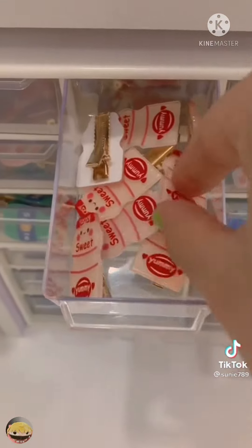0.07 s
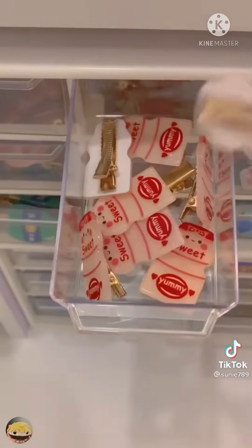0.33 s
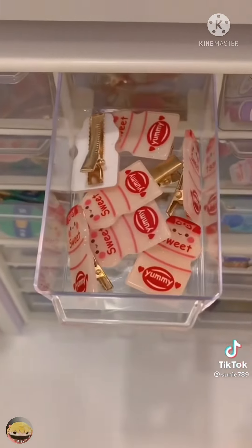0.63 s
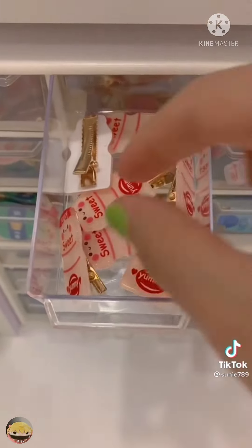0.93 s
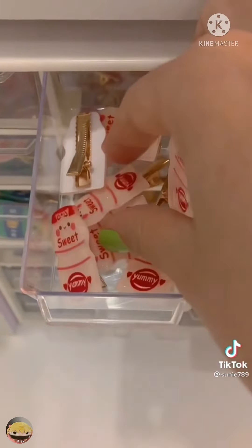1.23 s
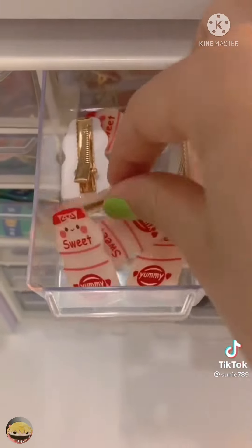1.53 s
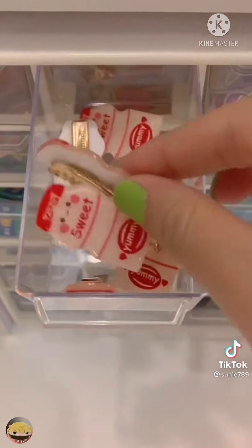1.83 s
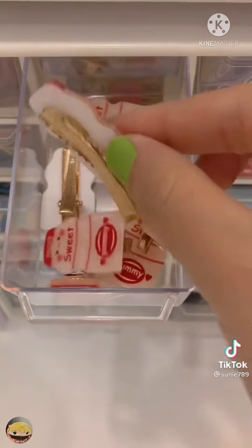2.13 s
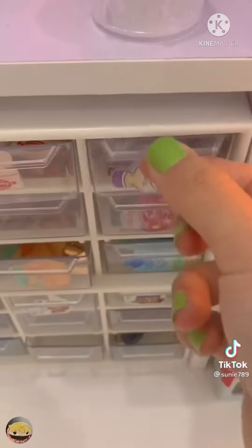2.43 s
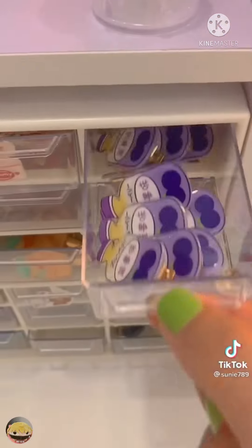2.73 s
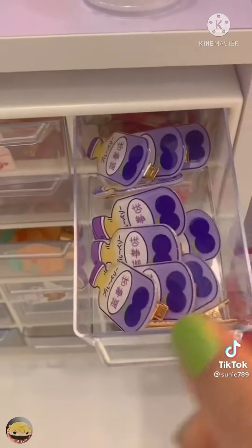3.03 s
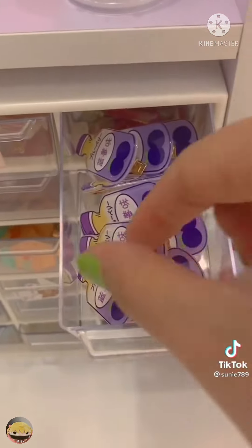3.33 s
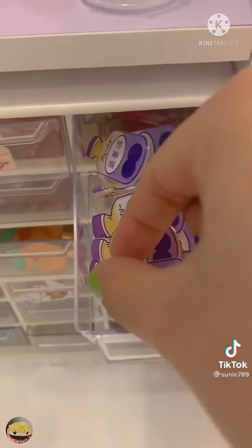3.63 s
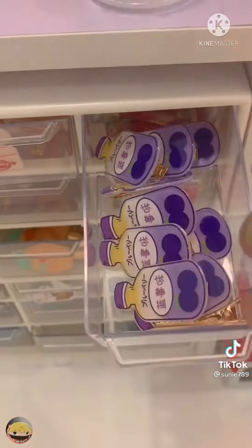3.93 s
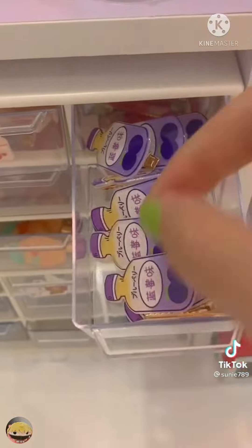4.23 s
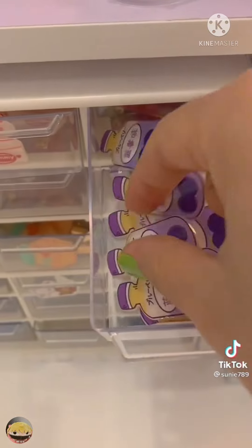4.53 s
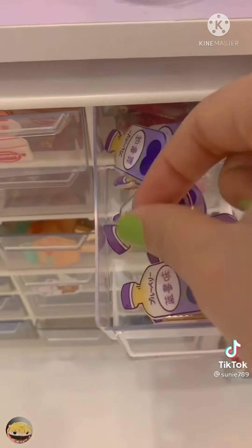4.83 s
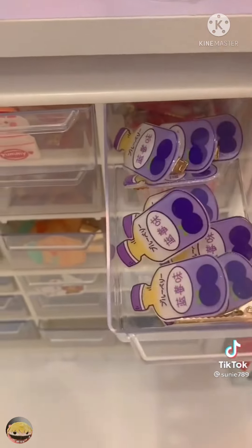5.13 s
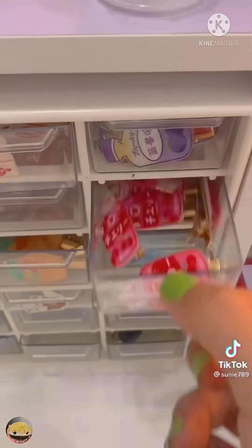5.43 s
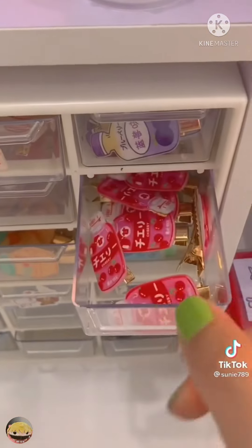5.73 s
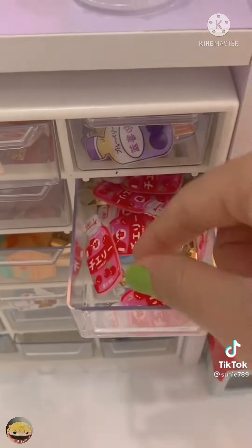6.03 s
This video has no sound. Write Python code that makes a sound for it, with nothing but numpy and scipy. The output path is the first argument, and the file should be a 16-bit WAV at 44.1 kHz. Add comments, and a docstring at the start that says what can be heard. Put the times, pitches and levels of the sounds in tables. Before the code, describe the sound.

Sharp, short clacks and bright clinks come from acrylic and metal hair clips being stirred in a plastic drawer, mixed with brief scrapes and hollow fingertip bumps. Another drawer rubs quietly open, and a second flurry of rattling comes a little later. A metal tick, a third soft slide and a few faint taps finish. Everything is heard up close, over constant mains hum in a small room.

```python
"""A hand sorts metal-backed acrylic hair clips in the small plastic drawers of a desk cabinet.
First, clips knock on each other and the drawer, scrape over the heap and tick with their metal jaws.
At 2.4 s a second drawer slides open and the sorting goes on there; at 5.3 s a third slides open and
a few light knocks follow. The sound drops out briefly as each slide begins. All along, mains hum fills
the small room, and the hardest knocks drive the close microphone into its limiter."""
import sys
import numpy as np
from scipy import signal
from scipy.fft import rfft, irfft, next_fast_len
from scipy.io import wavfile
from scipy.ndimage import uniform_filter1d, minimum_filter1d

SR = 44100
rng = np.random.default_rng(int(sys.argv[2]) if len(sys.argv) > 2 else 0)


def transcribe(signal):
    """Save signal, clipped to [-1, 1], as a 16-bit WAV file at the path in sys.argv[1]."""
    frames = np.atleast_2d(signal).T
    limited = np.clip(frames, -1, 1)
    pcm = np.round(limited * 32767).astype(np.int16)
    wavfile.write(sys.argv[1], SR, pcm)


N = 272097
TIME = np.arange(N) / SR


# clips hit each other and the drawer: (t/s, clack level/dB, hardness/dB, time to fade by 60 dB/s)
KNOCKS = [(.002, -18, -3.5, .034), (.007, -24, -0.5, 0.098), (.071, -35, 6.5, 0.032), (.1, -30, -2, 0.012),
          (.16, -32, -0.5, .04), (.186, -27.5, 1, 0.022), (.218, -18.5, 2, 0.081), (.236, -20, -2, 0.061),
          (.253, -18.5, -2, 0.062), (.2585, -8.5, 0.5, 0.046), (.276, -24, 6.5, 0.053),
          (.2895, -9, 3, 0.056), (.324, -13, 4.5, 0.026), (.355, -20, 5, 0.034), (.382, -27, 6, 0.082),
          (.397, -20, -2.5, 0.055), (1.128, -26, -2.5, 0.046), (1.183, -38, 2.5, .04),
          (1.194, -32.5, 0.5, 0.078), (1.237, -32.5, 7.5, 0.022), (1.248, -19, -1.5, 0.15),
          (1.259, -10, 6, 0.043), (1.306, -25, 8.5, .036), (1.32, -31.5, 5, .027), (1.358, -27.5, 0, .015),
          (1.371, -29, 3, 0.019), (1.383, -16, -1, 0.08), (1.409, -9.5, 4.5, .05), (1.458, -18, 4, 0.027),
          (1.477, -26, 3, 0.071), (1.524, -30, 3, .04), (1.531, -20, 0.5, 0.038), (1.583, -30, 4, 0.039),
          (1.651, -27, 3.5, .04), (1.662, -16.5, 3.5, 0.072), (1.707, -13.5, 3.5, 0.047),
          (1.727, -21.5, 2.5, 0.079), (1.749, -5, 4.5, 0.05), (1.8, -23, -5, 0.12),
          (1.894, -26, -2.5, 0.029), (1.982, -22.5, -1.5, 0.023), (1.991, -21.5, -7, 0.088),
          (2.049, -38, 1.5, 0.027), (2.054, -22, -5.5, 0.039), (2.08, -29, 0.5, .044),
          (2.1092, -9, 4.5, 0.037), (2.142, -13.5, 7, 0.03), (2.174, -19.5, 0.5, 0.016),
          (2.216, -24.5, 0, 0.09), (2.313, -32, 4.5, 0.074), (2.968, -28, 1, 0.027),
          (3.456, -33, -2.5, 0.034), (3.623, -52, -14, .04), (3.76, -44, 0, .1), (3.797, -53, 13.5, 0.024),
          (4.416, -26.5, -6, 0.069), (4.424, -22.5, 1, 0.095), (4.453, -18.5, 0, .075),
          (4.533, -36.5, -8, 0.12), (4.592, -25.5, -1, 0.03), (4.601, -16, 0.5, 0.037),
          (4.612, -21, 10, 0.021), (4.64, -23.5, -1.5, 0.01), (4.694, -24.5, -2, .028),
          (4.76, -33, -11, 0.032), (4.782, -26.5, -2.5, 0.052), (4.803, -18, 1.5, 0.067),
          (4.823, -19, 4.5, .032), (4.835, -19, 8, 0.11), (4.843, -22.5, 3, 0.03), (4.864, -21.5, 1, 0.042),
          (4.889, -17, -1, 0.032), (4.895, -19, 2, 0.038), (4.973, -17.5, 3.5, 0.074),
          (5.578, -26, 7, 0.067), (5.6, -26, 5.5, 0.042), (5.649, -32.5, 5, 0.055),
          (5.666, -30.5, 4.5, .05), (5.77, -53.5, -11, 0.057), (6.1, -45, -11, .09)]
def knocks(rows):
    """A run of knocks, each one made afresh and placed at its time."""
    out = np.zeros(N)
    for row in rows:
        add_at(out, row[0], knock(*row))
    return out


def knock(s, clack_db, hardness_db, t60, snap_db=12.5, rise_s=.0011, hold_s=.0016):
    """One contact: a snap, then chatter and reflections between the drawer walls that die quickly."""
    t = TIME[:SR // 8]
    dying_s = np.maximum(t - hold_s, 0)   # the first reflections are as strong as the blow
    force = rng.standard_normal(len(t)) * from_db(-60 * dying_s / t60)
    force *= 1 - np.exp(-t / rise_s)   # the jolt takes a moment to spread through the heap
    force[0] = from_db(snap_db)
    # every clip is struck at another spot, so pitches and levels differ a little each time
    modes = modes_at(s)
    modes[:, 0] *= 1 + .0057 * rng.standard_normal(len(modes))
    modes[:, 2] += 1.66 * rng.standard_normal(len(modes))
    modes[:, 1] += 20   # Hz wider: the fingers and the heap damp the ringing
    sound = drawer(force, modes, dense_db=-9.5)
    return balance_knock(sound, s, clack_db, hardness_db)


# edges of a knock's four ranges, called thud, clack, ring and sparkle: f/Hz
RANGE_EDGES = [250, 1100, 3300, 7500, 16000]
# an ordinary knock in the first drawer, the second and the cabinet, compared with its clack:
# (thud level/dB, ring level/dB, sparkle level/dB)
KNOCK_TONES = [(-11, -5.5, -13), (-15, -6, -17), (-13, -12.5, -23.5)]
def balance_knock(sound, s, clack_db, hardness_db, ordinary_db=-24.5):
    """Light touches have a larger share of thud; hard contacts ring and sparkle more."""
    thud_db, ring_db, sparkle_db = KNOCK_TONES[place_at(s)]
    thud_db += .35 * (ordinary_db - clack_db)
    levels_db = clack_db + np.array([thud_db, 0, ring_db + hardness_db, sparkle_db + hardness_db])
    parts = [band(sound, low, high) for low, high in zip(RANGE_EDGES, RANGE_EDGES[1:])]
    onset = int(.008 * SR)   # each range has its level in the first 8 ms
    return sum(from_db(db) * part / np.std(part[:onset]) for db, part in zip(levels_db, parts))


# tone of the plastic's many weak resonances, blurred together: (f/Hz, level/dB)
PLASTIC_TONE = [(200, -16.5), (400, -15), (800, -3), (1400, -3.5), (2000, -1.5), (2800, -2), (4500, 1),
                (6500, -6), (8200, -8), (11000, -8.5), (15500, -6)]
def drawer(force, modes, dense_db):
    """A drawer full of clips rings at a few strong pitches, its modes, over a bed of weak ones."""
    out = from_db(dense_db) * colour(force, PLASTIC_TONE)
    for hz, width_hz, level_db in modes:
        r = np.exp(-np.pi * width_hz / SR)   # share of the ringing left after one sample
        poles = [1, -2 * r * np.cos(2 * np.pi * hz / SR), r * r]
        ringing = (1 - r * r) / 2 * signal.lfilter([1, 0, -1], poles, force + 1e-18)
        out += from_db(level_db) * ringing
    return out


# pitches at which the two filled drawers and the cabinet ring: (f/Hz, width/Hz, level/dB)
FIRST_DRAWER_MODES = [(948, 100, -7), (1383, 27, -2), (1435, 14, -1), (1494, 79, 5), (1700, 69, 2.5),
                      (2348, 46, -1), (2440, 100, 3.5), (2683, 80, 4), (2833, 60, -5.5), (3100, 44, -9),
                      (3742, 50, -2), (4010, 41, -7.5), (4260, 45, -3), (5364, 40, -12.5),
                      (5640, 170, -5.5), (5840, 190, -6), (6400, 150, -9), (7000, 76, -14), (9160, 37, -9),
                      (9600, 50, -24), (11400, 110, -16)]
SECOND_DRAWER_MODES = [(400, 20, -24), (681, 31, 5.5), (864, 800, -4.5), (1453, 26, 12), (1592, 68, 7),
                       (1820, 130, 7), (2224, 144, 4), (2605, 470, -2.5), (3090, 21, -22), (3420, 150, 0),
                       (3810, 54, -8.5), (4450, 95, -8), (5380, 94, 1), (5880, 91, -3), (6300, 88, -7),
                       (8260, 120, -15), (8980, 140, -5), (11200, 270, -13)]
CABINET_MODES = [(377, 19, -8), (421, 15, -5), (584, 200, -4), (640, 98, -41), (1100, 160, -2),
                 (1420, 100, 3.5), (1630, 125, 0), (2295, 140, -5.5), (2610, 100, -0.5), (3600, 61, -25),
                 (3670, 69, -13), (4500, 69, -13.5), (5400, 210, -5.5), (6190, 300, -6), (7060, 140, -11),
                 (8830, 910, -11), (11200, 400, -14), (13304, 710, -11)]
def modes_at(s):
    """The modes of whatever the hand is moving at this time."""
    return np.array([FIRST_DRAWER_MODES, SECOND_DRAWER_MODES, CABINET_MODES][place_at(s)], float)


def place_at(s):
    """Where the hand is at s seconds: 0 first drawer, 1 second drawer, 2 cabinet."""
    return 0 if s < 2.42 else 1 if 3.2 < s < 5.32 else 2


# hard knocks set a clip's metal back ringing: (t/s, f/Hz, level/dB, time to fade by 60 dB/s)
CLINKS = [(.2595, 2700, -16, .05), (.291, 2754, -10, .07), (.3245, 2744, -14, .08),
          (.3245, 4210, -8.5, .06), (1.7077, 4400, 1.5, .04), (1.727, 4430, -11.5, .05),
          (2.109, 2740, -7.5, .06), (2.142, 2740, -6.5, .05)]
def clinks():
    """The metal backs ring at a clear pitch and die quickly."""
    out, t = np.zeros(N), TIME[:SR // 6]
    for s, hz, level_db, t60 in CLINKS:
        add_at(out, s, from_db(level_db) * ring(t, hz, t60))
    return out


# times when the heap is disturbed: (start t/s, end t/s, level/dB)
JOSTLES = [(0.105, .21, -40.5), (1.192, 1.22, -37), (1.601, 1.9, -37.5), (2.227, 2.32, -35.5),
           (2.529, 2.65, -51), (4.649, 4.7, -41.5), (4.899, 4.94, -44), (5.379, 5.52, -45.5),
           (5.587, 5.68, -36)]
def jostles(gap_s=.033, spread_db=4, usual_hardness_db=-4.5, t60=.045):
    """Loose clips knock lightly at uneven intervals, each with its own strength and hardness."""
    rows = []
    for start, end, level_db in JOSTLES:
        chances = rng.standard_normal((12, 3))
        for slot_s, (late, strong, hard) in zip(np.arange(start, end, gap_s), chances):
            s = slot_s + gap_s * (1 + np.tanh(late)) / 2
            rows.append((s, level_db + spread_db * strong, usual_hardness_db + spread_db * hard, t60))
    return knocks(rows)


# metal jaws tick: (t/s, level/dB, f/Hz, time to fade by 60 dB/s, after-ring level/dB, lowest f/Hz)
TICKS = [(.581, -32, 6370, 0.012, 0, 2000), (0.5866, -21.5, 5790, 0.0067, -4.5, 1000),
         (0.619, -37, 6050, 0.0078, -8, 1224), (0.622, -51, 6300, .01, -1, 3100),
         (4.168, -49.5, 8760, 0.0096, -15, 4000), (5.2957, -16.5, 8380, 0.0095, -5, 2606),
         (5.31, -43, 8500, 0.0096, -15, 2700)]
# the after-ring of the thin metal: (f/Hz, level/dB, time to fade by 60 dB/s)
JAW_MODES = [(4190, -16, 0.036), (8350, -32, 0.13), (8700, -23, 0.049), (13900, -14, 0.035)]
# tone of the crack of metal on metal: (f/Hz, level/dB)
CRACK_TONE = [(1500, 1.5), (3100, -4), (4400, -5.5), (6000, -9), (8400, -3), (10400, -16), (13500, -4),
              (15500, -6)]
def jaw_ticks(crack_db=6, crack_s=.00098):
    """Metal touches metal: a tiny crack, a short bright ring and a faint longer one."""
    out, t = np.zeros(N), TIME[:SR // 10]
    after_ring = sum(from_db(db) * ring(t, hz, t60) for hz, db, t60 in JAW_MODES)
    for s, level_db, hz, t60, after_db, lowest_hz in TICKS:
        crack = colour(rng.standard_normal(len(t)) * np.exp(-t / crack_s), CRACK_TONE)
        tick = ring(t, hz, t60) + from_db(crack_db) * crack + from_db(after_db) * after_ring
        for _ in range(2):   # the smaller the part, the less bass it gives off
            tick = band(tick, lowest_hz, 16000)
        add_at(out, s, from_db(level_db) * tick)
    return out


# fingers push the clips: (start t/s, rise/s, hold/s, fall/s, scrape level/dB, hiss level/dB)
PUSHES = [(.05, 0.085, .08, 0.054, -41, -59), (.17, 0.073, 0.049, 0.22, -23, -31),
          (1.2, 0.11, 0.0092, 0.048, -34.5, -63), (1.37, 0.055, .02, .09, -34, -46),
          (1.56, 0.053, 0.095, 0.068, -36, -51), (1.7, 0.044, 0.018, 0.19, -27, -42),
          (2.105, 0.028, 0.009, 0.081, -23, -31.5), (2.28, 0.044, 0.0057, 0.073, -37.5, -55),
          (2.47, 0.094, 0.058, 0.043, -43, -52.5), (3.465, 0.035, 0.041, 0.037, -45, -49),
          (3.725, 0.039, .025, .06, -50.5, -56), (4.42, 0.028, .01, 0.047, -27, -45),
          (4.585, 0.04, 0.012, 0.039, -25, -40), (4.77, 0.061, 0.072, 0.053, -25, -39.5),
          (5.165, .035, 0.0095, .05, -59, -57.5), (6.07, 0.042, .06, .08, -43.5, -59.5)]
def heap_scrapes():
    """Clips drag over the heap with a coarse, grainy scrape."""
    return friction(PUSHES, slips_per_s=440, grain_db=3.5, smooth_db=-4.5,
                    uneven_db=2, echo_s=.004, dense_db=-15)


# drawers slide open: (start t/s, rise/s, hold/s, fall/s, scrape level/dB, hiss level/dB)
SLIDES = [(2.39, 0.14, 0.42, 0.1, -49.5, -52.5), (5.32, .04, 0.28, 0.029, -48.5, -47.5)]
def drawer_slides():
    """Drawers rub along their runners with a finer grain and a more uneven level."""
    return friction(SLIDES, slips_per_s=970, grain_db=2, smooth_db=2.5,
                    uneven_db=4.2, echo_s=.0031, dense_db=-6.5)


def friction(strokes, slips_per_s, grain_db, smooth_db, uneven_db, echo_s, dense_db):
    """Plastic rubs on plastic: tiny slips of uneven size set the drawer ringing."""
    out = np.zeros(N)
    for start, rise_s, hold_s, fall_s, scrape_db, hiss_db in strokes:
        slips = (rng.random(SR) < slips_per_s / SR) * rng.standard_normal(SR)
        slips *= from_db(grain_db * rng.standard_normal(SR))
        force = rms_one(slips) + from_db(smooth_db) * rng.standard_normal(SR)
        force *= from_db(uneven_db * drift(per_s=70)[:SR])
        body = drawer(wall_echoes(force, echo_s), modes_at(start + rise_s), dense_db)
        scrape = from_db(scrape_db) * rms_one(band(body, 300, 4500))
        hiss = from_db(hiss_db) * rms_one(band(body, 5000, 19000))
        add_at(out, start, (scrape + hiss) * stroke_gain(TIME[:SR], rise_s, hold_s, fall_s))
    return out


def stroke_gain(t, rise_s, hold_s, fall_s, depth_db=28.5):
    """A push gathers speed from depth_db under its full level, holds it and comes to rest."""
    rising = np.maximum(1 - t / rise_s, 0)
    falling = np.maximum(t - rise_s - hold_s, 0) / fall_s
    return from_db(-depth_db * np.minimum(rising + falling, 2) ** 2)


def wall_echoes(force, echo_s):
    """Quick echoes between the walls give a hollow tone that changes as the place of contact moves."""
    hop = SR // 16
    padded = np.pad(force, (hop, 3 * hop))
    out = np.zeros(len(padded))
    for at in range(0, len(force) + hop, hop):
        echoes = rng.standard_normal(hop) * np.exp(-TIME[:hop] / echo_s)
        piece = padded[at:at + 2 * hop] * signal.windows.cosine(2 * hop)
        out[at:at + 3 * hop - 1] += signal.fftconvolve(piece, rms_one(echoes))
    return out[hop:hop + len(force)]


# a fingertip bumps the drawer: (t/s, level/dB, f/Hz that this spot favours)
BUMPS = [(.127, -25.5, 953), (1.624, -36, 704), (1.794, -22.5, 766), (1.823, -35, 704), (1.878, -40, 600),
         (2.115, -20, 500), (2.968, -31.5, 624), (3.456, -35, 696), (3.494, -30, 695), (3.76, -40, 560),
         (3.797, -43, 617), (5.649, -31, 903)]
# low pitches at which the drawer's floor rings: (f/Hz, level/dB, time to fade by 60 dB/s)
FLOOR_MODES = [(380, -14, .08), (435, -10, 0.071), (550, -11.5, .04), (653, -6.5, 0.12), (845, 0, 0.065)]
def finger_bumps(vary_db=2.5, soft_s=.002, fall_db_per_octave=12.5):
    """A soft touch rings only the low, hollow modes; the spot that is touched sets their mix."""
    out, t = np.zeros(N), TIME[:SR // 4]
    soft_start = 1 - np.exp(-t / soft_s)
    for s, level_db, favoured_hz in BUMPS:
        for hz, mode_db, t60 in FLOOR_MODES:
            octaves_away = abs(np.log2(hz / favoured_hz))
            spot_db = vary_db * rng.standard_normal() - fall_db_per_octave * octaves_away
            add_at(out, s, from_db(level_db + mode_db + spot_db) * ring(t, hz, t60) * soft_start)
    return out


# tone of the room's echo: (f/Hz, level/dB)
ECHO_TONE = [(200, 11), (1000, -2.5), (3000, -5), (6000, -9.5), (10000, -8.5), (16000, -11.5)]
def room_echo(x, t60=.38, rise_s=.0053, gain_db=-15):
    """A small room answers with a soft, duller tail."""
    t = TIME[:SR // 2]
    tail = rng.standard_normal(len(t)) * from_db(-60 * t / t60)
    tail *= 1 - np.exp(-t / rise_s)
    tail = colour(tail / np.linalg.norm(tail), ECHO_TONE)
    return from_db(gain_db) * signal.fftconvolve(x, tail)[:N]


# mains hum and two faint steady tones: (f/Hz, level/dB)
HUM_TONES = [(100.05, -38), (160, -64), (270, -68)]
# how loud the deep drone is over time: (t/s, level/dB)
DRONE_LEVELS = [(0, -57.5), (1.2, -46.5), (1.7, -57.5), (3.1, -56),
                (3.75, -43), (4.25, -57), (4.8, -52.5), (6.17, -53)]
def hum_and_drone(waver_db=.34, drone_hz=49):
    """The mains hum wavers slightly while a deep drone swells and sinks."""
    tones = [(hz, db + waver_db * drift(per_s=5)) for hz, db in HUM_TONES]
    tones.append((drone_hz, np.interp(TIME, *np.transpose(DRONE_LEVELS))))
    return sum(from_db(db) * np.sqrt(2) * np.sin(2 * np.pi * (hz * TIME + rng.random()))
               for hz, db in tones)


# tone of the room's air: (f/Hz, level/dB)
AIR_TONE = [(25, -33.5), (40, -19), (60, 6), (90, 0), (145, 0.5), (195, -4), (250, -16), (330, -20),
            (430, -22), (600, -21), (1200, -21), (2500, -33.5), (6000, -41.5), (15500, -47.5)]
def room_air(level_db=-47):
    """The low, steady rush of the room."""
    return from_db(level_db) * rms_one(colour(rng.standard_normal(N), AIR_TONE))


def from_db(db):
    """Turn decibels into a number to multiply by."""
    return 10 ** (np.asarray(db) / 20)


def rms_one(x):
    """Scale a sound to an average strength (rms) of 1."""
    return x / np.sqrt(np.mean(x ** 2) + 1e-20)


def add_at(out, s, sound):
    """Mix a sound into out, starting at s seconds."""
    at = int(s * SR)
    out[at:at + len(sound)] += sound[:N - at]


def band(x, low_hz, high_hz):
    """Keep what lies between two frequencies."""
    band_pass = signal.butter(3, [low_hz, high_hz], "band", fs=SR, output="sos")
    return signal.sosfilt(band_pass, x + 1e-18)


def colour(x, tone):
    """Shape a sound's tone by (f/Hz, level/dB) points."""
    size = 2 * next_fast_len(len(x))
    hz, level_db = np.transpose(tone)
    gain = from_db(np.interp(np.log(np.fft.rfftfreq(size, 1 / SR) + 1), np.log(hz), level_db))
    cepstrum = irfft(np.log(gain))[:size // 2]
    cepstrum[1:] *= 2   # minimum phase, so that nothing sounds early
    return irfft(rfft(x, size) * np.exp(rfft(cepstrum, size)))[:len(x)]


def drift(per_s):
    """Glide from one random value to the next, per_s times a second."""
    points = rng.standard_normal(N // 20)
    return np.interp(TIME * per_s, np.arange(len(points)), points)


def ring(t, hz, t60):
    """One struck pitch that fades by 60 dB in t60 seconds."""
    return np.sin(2 * np.pi * hz * t) * from_db(-60 * t / t60)


def scene():
    """Clips and drawers close to the microphone, in the humming room."""
    background = hum_and_drone() + room_air()
    close = heap_scrapes() + drawer_slides() + clinks() + jaw_ticks() + finger_bumps()
    close = close + knocks(KNOCKS) + jostles()
    return (close + room_echo(close) + background)[None]


def limiter(x, release_db_per_s=1500):
    """Turn the level down just ahead of each peak above full scale, and back up within milliseconds."""
    over_db = 20 * np.log10(np.maximum(np.abs(x), 1))
    nearby_peak_db = -minimum_filter1d(-over_db, size=33)
    recovery = release_db_per_s * TIME
    held_db = np.maximum.accumulate(nearby_peak_db + recovery) - recovery
    return x * from_db(-uniform_filter1d(held_db, size=33))


# the sound drops out briefly: (start t/s, end t/s)
DROPOUTS = [(2.408, 2.426), (5.3267, 5.335)]
def record(dry, dropout_db=-38, cutoff_hz=15600):
    """The hardest knocks are held at full scale, the sound drops out twice, the top treble is cut."""
    gain = np.ones(N)
    for start, end in DROPOUTS:
        gain[int(start * SR):int(end * SR)] = from_db(dropout_db)
    limited = limiter(dry[0]) * uniform_filter1d(gain, size=90)
    low_pass = signal.ellip(10, .1, 70, cutoff_hz, fs=SR, output="sos")
    return signal.sosfilt(low_pass, limited[None])


dry = scene()
out = record(dry)
transcribe(out)
```